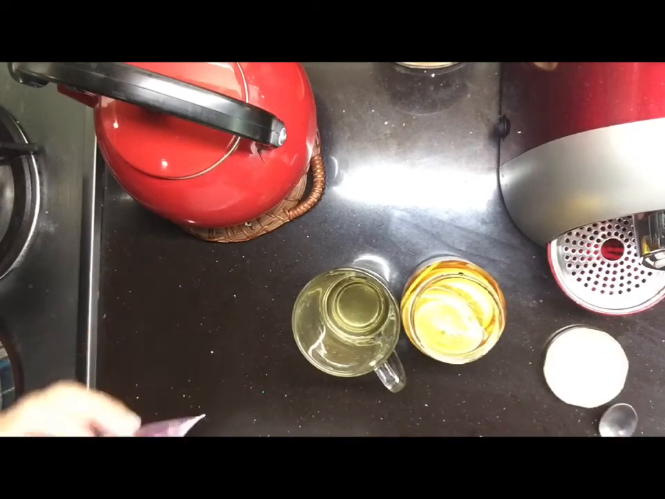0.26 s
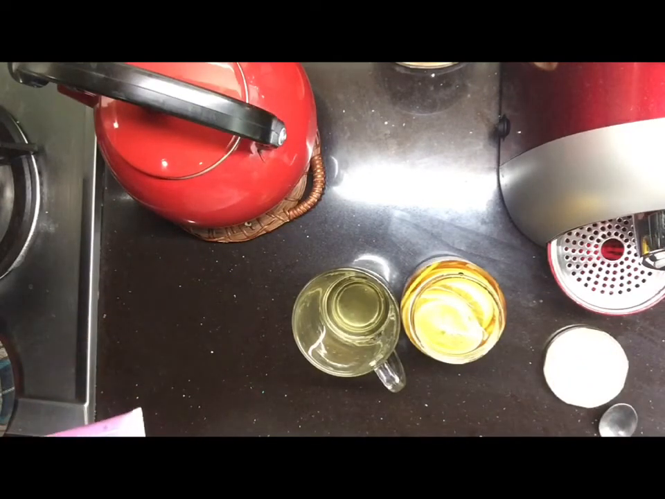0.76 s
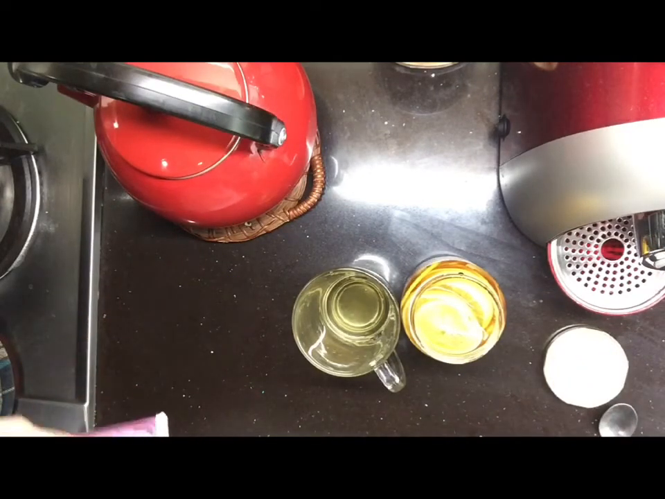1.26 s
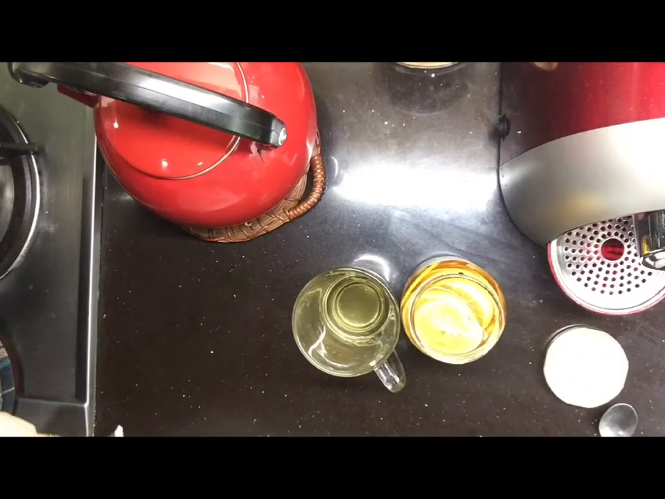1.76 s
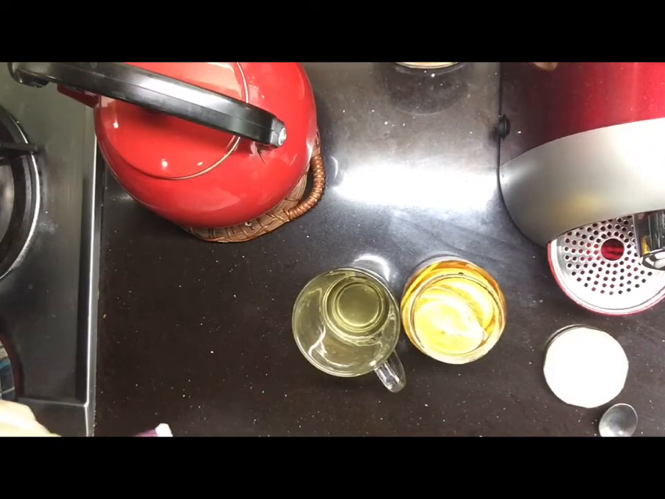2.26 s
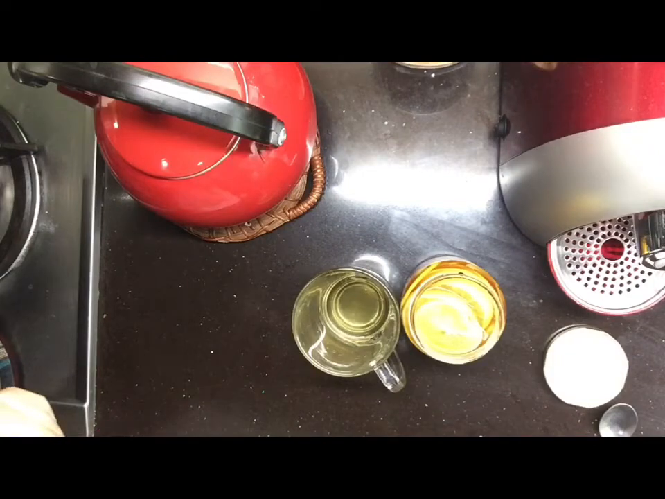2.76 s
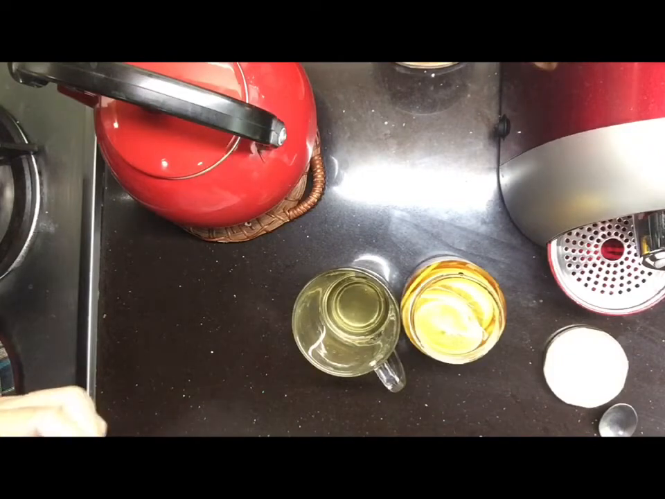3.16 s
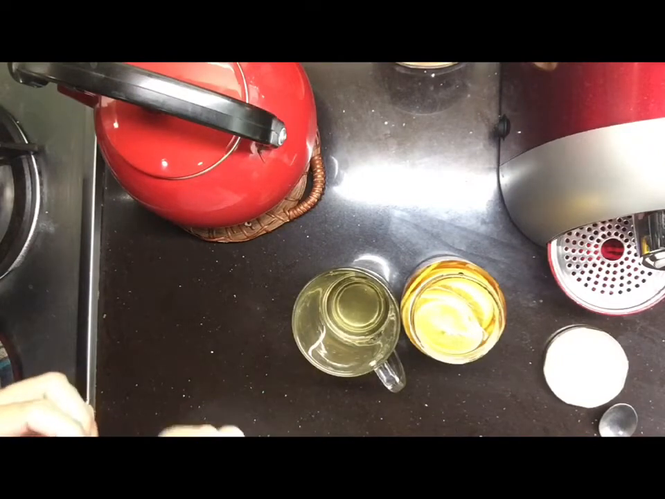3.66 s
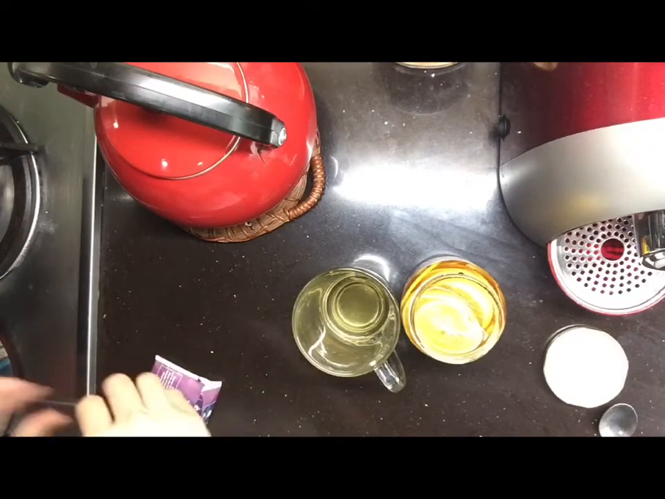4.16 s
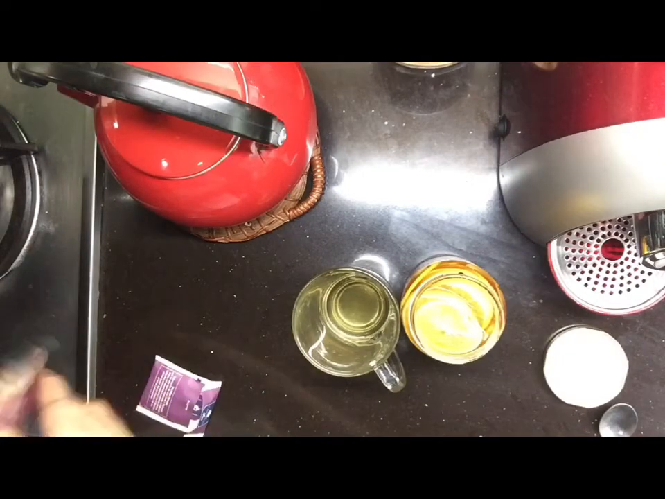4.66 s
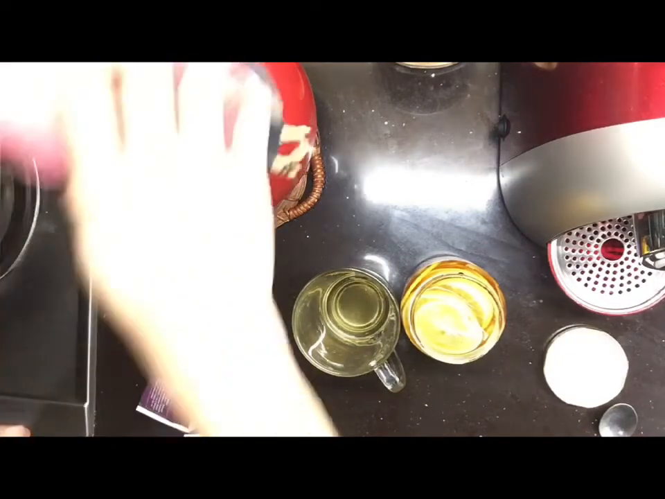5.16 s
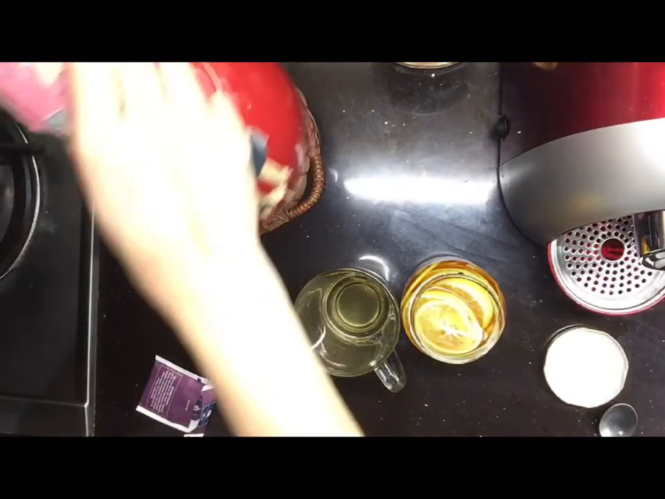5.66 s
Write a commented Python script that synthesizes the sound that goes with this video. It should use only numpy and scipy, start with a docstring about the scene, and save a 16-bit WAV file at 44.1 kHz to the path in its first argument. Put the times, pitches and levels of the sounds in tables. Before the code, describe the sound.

In a quiet kitchen, a steel spoon rattles to rest on a stone counter while a foil-lined paper sachet starts crinkling close by. Sharp snaps and dry rustles peak around 1.3 seconds, then come in looser bursts until about 4.2. A soft double thump follows, then near silence with tiny cloth brushes and faint low bumps. Close microphone, short room tail, low hum and hiss.

```python
"""Close paper rustle and sharp foil crackle, a steel spoon rattling to rest, soft thumps, faint brushing. A
foil-lined sachet is crinkled and torn over a stone counter: noise slips and snaps through panel resonances. The
spoon is decaying sines re-struck at each touch; its first touches thump the counter's low modes, and a hand
thumps them late on. Last, a cloth laid on a kettle handle brushes as crackle noise. Shaped noise gives the
kitchen's faint low hum and hiss; decaying noise gives its short tail."""
import sys
import numpy as np
from scipy import signal
from scipy.fft import rfft, irfft, next_fast_len
from scipy.io import wavfile
from scipy.ndimage import uniform_filter1d, map_coordinates

SR = 44100
rng = np.random.default_rng(int(sys.argv[2]) if len(sys.argv) > 2 else 0)


def to_wav(sig):
    """Store sig (one row per channel, or 1-D mono) as 16-bit WAV at the path in sys.argv[1].

    Samples outside -1..1 are clipped; the rate is SR.
    """
    pcm = np.clip(np.atleast_2d(sig), -1, 1) * 32767
    pcm = np.round(pcm).astype(np.int16)
    wavfile.write(sys.argv[1], SR, pcm.T)  # frames by channels


N = 260101


def amp(db):
    """Gain of a level in dB."""
    return 10 ** (np.asarray(db) / 20)


def unit(x):
    """Scale to rms 1."""
    return x / np.sqrt(np.mean(x ** 2, axis=-1, keepdims=True) + 1e-20)


def along(points, hz):
    """Interpolate (f/Hz, value) points on a log frequency axis."""
    f, value = np.transpose(points)
    return np.interp(np.log(hz + 1), np.log(f + 1), value)


def filtered(x, response):
    """Multiply the spectrum of x by a response of frequency, zero-padded."""
    m = next_fast_len(x.shape[-1] + SR // 4)
    spectrum = rfft(x, m) * response(np.fft.rfftfreq(m, 1 / SR))
    return irfft(spectrum, m)[..., :x.shape[-1]]


def peak(f, hz, q):
    """Response of one causal resonance, 1 at its centre."""
    damping = 1j * f * hz / q
    return damping / (hz * hz - f * f + damping)


def add(track, start_s, sound):
    """Mix a sound into the track at start_s."""
    part = track[round(start_s * SR):][:len(sound)]
    part += sound[:len(part)]


def wobble(rate_hz):
    """Smooth random curve with rate_hz knots a second."""
    knots = rng.standard_normal(int(N * rate_hz / SR) + 4)
    return map_coordinates(knots, [np.arange(N) * rate_hz / SR])


def burst(t, t60_s, spike):
    """Noise dying over t60_s, led by a 1.7 ms noise spike and a sharp click."""
    click = np.gradient(np.exp(-(t / .00012 - 2) ** 2))
    envelope = amp(-60 * t / t60_s) + .5 * spike * amp(-60 * t / 0.0017)
    return rng.standard_normal(len(t)) * envelope + 9 * spike * click


def crackle(per_s, spread_db, t60_s):
    """Clumped tiny slips of unequal size, each a short puff of noise; loudness evened over 50 ms."""
    size = amp(spread_db * rng.exponential(size=N) + 0.86 * wobble(60))
    slips = (rng.random(N) < per_s / SR) * size
    puffs = signal.lfilter([1], [1, -amp(-60 / (t60_s * SR))], slips)
    local_mean = uniform_filter1d(puffs, size=SR // 20).clip(1e-9)
    return puffs / local_mean * rng.standard_normal(N)


def air():
    """Steady room tone: noise shaped by a fixed spectrum."""
    # room tone spectrum: f/Hz, relative density/dB per Hz
    tone_spectrum = [(15, -57), (25, -20), (68, 1.5), (105, -1), (200, -7), (296, -6), (470, -11.5),
                     (979, -12.5), (3000, -16.5), (5000, -20), (6100, -18.5), (6860, -13.5), (7600, -22),
                     (10500, -28.5), (12500, -25.5), (16000, -35)]
    tone = filtered(rng.standard_normal(N), lambda f: amp(along(tone_spectrum, f)))
    return amp(-68) * unit(tone)


def rustle():
    """Each panel slips on its own and rings at its pitch; broader slips sound in sheet, foil and hollow."""
    # finger squeezes: t of peak/s, relative level/dB, rise/s and fall/s over 20 dB, relative foil sizzle/dB
    squeezes = [(0, -43, .1, 0.13, -11.5), (.42, -57, 1.9, 0.99, -8), (.729, -44.5, .065, 0.042, -13.5),
                (.815, -46, .06, 0.047, -12), (.87, -54, .1, 0.71, -12.5), (1.136, -45.5, 0.21, 0.28, -8),
                (1.323, -32.5, .08, 0.073, -6), (1.42, -53, 0.13, 0.42, -5.5), (1.65, -91, .1, 0.5, 0),
                (1.82, -46.5, 0.23, 0.026, -12), (2.11, -55.5, 0.46, .2, -25.5),
                (2.203, -43, 0.11, 0.1, -8.5), (2.291, -55.5, .1, 0.27, 1.5),
                (2.513, -59.5, 0.015, 0.054, -4), (2.639, -52, .07, 0.023, -9),
                (2.742, -53, 0.051, 0.042, -11.5), (2.836, -59, .13, 0.21, -11.5),
                (2.985, -60.5, 0.1, 0.1, -19.5), (3.156, -45.5, 0.087, 0.102, -13),
                (3.294, -46.5, 0.14, 0.057, -17), (3.39, -52, .11, 0.097, -14.5),
                (3.46, -53, 0.14, 0.13, -11.5), (3.65, -61, 0.025, 0.33, -5.5),
                (3.741, -51.5, 0.13, 0.1, -17.5), (3.884, -69, 0.18, .15, -14),
                (4.078, -54.5, .03, .03, -11), (4.098, -52.5, .02, 0.025, -7),
                (4.171, -46, 0.014, 0.048, -13.5)]
    # small panels of the crumpled sheet: f/Hz
    panel_pitches_hz = [1100, 1757, 2333, 3240, 3900, 5000, 6464]
    # paper spectrum: f/Hz, relative density/dB per Hz
    paper_spectrum = [(500, -39.5), (1000, -2.5), (2000, -3.5), (3700, -2.5), (6500, -9.5), (9000, -22),
                      (15000, -67)]

    peak_s, db, rise_s, fall_s, sizzle_db = np.transpose(squeezes)[..., None]
    since_s = np.arange(N) / SR - peak_s
    drop_db = 20 * np.where(since_s < 0, -since_s / rise_s, since_s / fall_s)
    swell = amp(db - drop_db)
    force = np.sqrt(np.sum(swell ** 2, axis=0))
    shine = np.sqrt(np.sum((swell * amp(sizzle_db)) ** 2, axis=0))

    slips = crackle(per_s=1200, spread_db=4.5, t60_s=0.05)
    panels = np.zeros(N)
    for hz in panel_pitches_hz:
        own_slips = crackle(per_s=160, spread_db=4, t60_s=.03)
        panels += unit(filtered(own_slips, lambda f: peak(f, hz, 3.5) ** 2)) * np.sqrt(hz)
    mix = .65 * unit(slips) + .8 * unit(panels)
    paper = unit(filtered(mix, lambda f: amp(along(paper_spectrum, f))))
    foil = unit(filtered(slips, lambda f: peak(f, 9600, 0.24) ** 2))
    hollow = unit(filtered(slips, lambda f: peak(f, 620, 1.0) ** 2))  # inside of the pouch
    return amp(-3.5) * (force * (paper + amp(-15.5) * hollow) + amp(3.0) * shine * foil)


def snaps():
    """A crease flips with a click; its panel rings as short coloured noise, treble gone first."""
    # snapping creases: t/s, relative peak level/dB, panel f/Hz, relative treble/dB, relative bass/dB
    creases = [(0.056, -17, 2670, -7, -14), (0.478, -30, 1100, -12, -16), (0.491, -37.5, 5000, -13, -26),
               (0.502, -33.5, 5900, -12.5, -21), (0.529, -30.5, 4280, -10, -11),
               (0.603, -13, 3160, -5.5, -20.5), (0.703, -30.5, 3900, -30, -40),
               (0.707, -23, 2040, -31.5, -25), (0.728, -35, 4720, -17, -38), (0.744, -24, 4000, -29, -11.5),
               (0.791, -34.5, 3400, -34, -15), (0.816, -18, 1240, -9.5, -15), (0.85, -35, 2330, -21, -26),
               (0.925, -34.5, 3600, -25, -10), (1.016, -33.5, 1960, -36, -39),
               (1.048, -26.5, 2870, -23, -40), (1.133, -13.5, 5250, -11, -37), (1.145, -20, 1960, -15, -11),
               (1.168, -43, 3640, 3, -24), (1.198, -14.5, 1320, -1.5, -55), (1.278, -23, 4080, -22, -26),
               (1.29, -21.5, 3900, -14.5, -25), (1.31, -21, 3690, -10, -25), (1.317, -15, 1222, -18, -44),
               (1.329, -12.5, 3700, -2, -17.5), (1.331, -22, 650, -30.5, -23), (1.342, -18, 3740, -18, -31),
               (1.358, -22, 4100, -13.5, 0), (1.363, -15, 4280, -25, -3), (1.369, -10.5, 2700, -12.5, -4.5),
               (1.403, -30.5, 1500, -21, 1.5), (1.439, -31, 2500, -37, -30), (1.459, -37.5, 594, -31, -3),
               (1.476, -16.5, 1260, -31, -6.5), (1.57, -35, 6900, -4.5, -9), (1.635, -33.5, 2810, -25, -5),
               (1.655, -30, 1850, -38, -14), (1.734, -18, 1640, -43, -50), (1.929, -36, 2230, -44, -8.5),
               (2.078, -39.5, 4350, -34, -38), (2.192, -24, 3950, -23, -35), (2.21, -22, 5530, -42, -13),
               (2.22, -24, 6500, -3, -30), (2.354, -33, 3800, -15, -28), (2.423, -28.5, 1950, -27, -20),
               (2.519, -26.5, 1660, -7.5, -38), (2.737, -23.5, 3880, -42, -42),
               (2.812, -27, 3540, -46, -41.5), (2.851, -23.5, 3800, -46, -46), (2.97, -40, 3320, -22, -39),
               (3.075, -37.5, 3250, -19, -37), (3.137, -27.5, 3930, -5, -9), (3.166, -28.5, 4330, -6, -9),
               (3.222, -14.5, 1870, -53.5, -21), (3.273, -28.5, 2350, -35, -44),
               (3.286, -28.5, 1950, -46, -42), (3.308, -34, 2270, -33, -42), (3.379, -31, 1240, -31, -37),
               (3.401, -20.5, 3200, -8, -58), (3.446, -20, 3800, -23, -55), (3.469, -16.5, 2080, -27, -49),
               (3.503, -31.5, 2980, -8, -13), (3.527, -37, 3500, -10, -28), (3.648, -34.5, 1100, -13, -29),
               (3.726, -33, 1290, -15.5, -30), (3.746, -14.5, 2420, -32.5, -40),
               (3.865, -43.5, 3260, -31, -25), (4.095, -30, 683, -43, -22.5), (4.15, -45.5, 890, -39, -32),
               (4.171, -28.5, 3200, -14, -20), (4.224, -45, 1210, -28, -14)]
    ref_db, ref_t60_s = -21, 0.036
    t60_db_per_db_softer = 0.34  # softer snaps linger

    out, t = np.zeros(N), np.arange(SR // 5) / SR
    for start_s, db, hz, treble_db, bass_db in creases:
        t60_s = ref_t60_s * amp(-t60_db_per_db_softer * (db - ref_db))
        body = burst(t, t60_s, spike=amp(-2.5))
        tick = burst(t, 0.21 * t60_s, spike=amp(1))
        sheet_gain = .7 * min(1, hz / 1150) ** 4  # large low panels hardly wake the rest of the sheet

        def panel(f):
            own = 1.1 * peak(f, hz, 3.1) * peak(f, hz, 1.7)
            sheet = sheet_gain * peak(f, 3100, 0.67) ** 2
            bass = amp(bass_db + 7.0) * peak(f, 395, 0.49) ** 4
            return own + sheet + bass

        treble = filtered(tick, lambda f: peak(f, 10500, 1.4) ** 2)
        sound = filtered(body, panel) + amp(treble_db + 0.5) * treble
        add(out, start_s + .0007, amp(db - 6.0) * sound / np.abs(sound).max())
    return out


def sachet():
    """The stone below sends a second copy a moment later, which combs the paper's sound."""
    delay_s = .00138

    def direct_and_echo(f):
        echo = .5 * np.exp(-2j * np.pi * f * delay_s) * np.abs(peak(f, 3600, .7))
        return 1.47 + echo

    return filtered(snaps() + rustle(), direct_and_echo)


def spoon():
    """Modes ring and flutter as the spoon rocks; each touch cracks and leaves them at new strengths."""
    # touches on stone: t/s, relative crack level/dB, crack f/Hz,
    # relative bending (stem) level/dB, relative twisting (neck, twist) level/dB
    touches = [(0.1267, -18, 7360, -16, -38.5), (0.146, -19.5, 2370, -20, -36),
               (0.1527, -21.5, 6400, -21.5, -17.5), (.170, -19, 1940, -26.5, -18),
               (0.184, -23.5, 1580, -32, -22.5), (0.199, -24.5, 7445, -35, -24),
               (.213, -19.5, 1740, -22.5, -29), (.241, -23.5, 7733, -28, -39),
               (0.257, -26, 2440, -28.5, -24.5), (.278, -26, 6960, -62, -31.5),
               (.305, -26.5, 6545, -35.5, -38.5), (0.351, -32, 4500, -49.5, -55)]
    # contact noise spectrum: f/Hz, relative level/dB
    contact_spectrum = [(60, -58), (150, -10), (700, -4.5), (2300, -0.5), (5000, 0.5), (8000, -6.5),
                        (12500, -7), (16000, -19.5)]
    # spoon modes, one list a family (bowl, stem, neck, twist): f/Hz, relative level/dB, t60/s
    mode_families = [
        [(4806, -7, .7), (4836, -3, .7), (5157, -10, .6)],
        [(9469, 0, .6), (14696, -12, .22)],
        [(6070, -7, .6), (6100, -7, .6), (9162, -3, .45), (10901, -2, .3)],
        [(11352, 0, .4), (13649, -4, .8)],
    ]

    out, t = np.zeros(N), np.arange(SR) / SR
    times_s, crack_db, crack_hz, bend_db, twist_db = np.transpose(touches)
    bowl_db = -20 - 130 * (times_s - times_s[0])  # struck at the first touch, then loses 130 dB/s
    neck_db = twist_db - 3
    last = np.searchsorted(times_s, t) - 1  # latest touch, -1 before the first
    for db, family in zip([bowl_db, bend_db, neck_db, twist_db], mode_families):
        for hz, level_db, t60_s in family:
            decay_db = 60 * (t - times_s[last]) / t60_s
            flutter_db = 1.5 * wobble(35)[:SR]
            swing = (last >= 0) * amp(db[last] + level_db - decay_db + flutter_db)
            swing = uniform_filter1d(swing, size=40)  # soften the steps
            out[:SR] += swing * np.sin(2 * np.pi * hz * (t - times_s[0]))

    chatter = amp(4 * wobble(260))  # tiny skids
    short_t = t[:SR // 4]
    for start_s, db, hz in zip(times_s, crack_db, crack_hz):
        crack = filtered(burst(short_t, 0.079, spike=1.7), lambda f: peak(f, hz, 3.7) ** 2)
        skids = burst(short_t, .13, spike=0.34) * chatter[round(start_s * SR):][:SR // 4]
        clatter = filtered(skids, lambda f: amp(along(contact_spectrum, f)))
        add(out, start_s, amp(db + 0.5) * crack + amp(db - 1.5) * clatter)
    return out


def thumps():
    """Soft blows push the counter's low modes and slap; stronger pushes ring longer, harder slaps are brighter."""
    # blows: t/s, relative low push level/dB, relative deepest mode level/dB, relative slap level/dB
    blows = [(0.149, -43.5, -22, -68), (0.202, -44, -23, -65), (4.352, -40, -14, -45),
             (4.364, -38.5, -7.5, -52.5), (4.738, -62.5, 3, -63.5), (5.265, -53, -9, -58),
             (5.282, -66.5, 8, -72), (5.442, -68, 8.5, -70), (5.495, -62, 2.5, -68)]
    # counter modes: f/Hz, relative level/dB, t60/s before scaling by force
    counter_modes = [(58.4, 3, 0.32), (108, 0.5, 0.22), (138, 1.5, 0.22), (193.9, -4, 0.16)]

    out, t = np.zeros(N), np.arange(SR // 2) / SR
    for start_s, push_db, deep_db, slap_db in blows:
        slap_hz = 850 * amp(0.16 * (slap_db + 48))
        t60_scale = 0.95 * amp(0.27 * (push_db + 41))
        low = np.zeros(len(t))
        for k, (hz, level_db, t60_s) in enumerate(counter_modes):
            mode_db = level_db + deep_db * (k == 0) - 60 * t / (t60_s * t60_scale)
            low += amp(mode_db) * np.sin(2 * np.pi * hz * t)
        low *= 1 - np.exp(-t / 0.0053)  # soft onset

        def slap_response(f):
            soft = 1 / (1 + (f / 1850) ** 12) ** .5
            return peak(f, slap_hz, 0.46) ** 2 * soft + 0.099 * peak(f, 4100, 0.98) ** 2

        slap = burst(t, 0.14 * t60_scale, spike=0.97) + 0.31 * burst(t, 0.4 * t60_scale, spike=0)
        add(out, start_s, amp(push_db) * low + amp(slap_db + 13.0) * filtered(slap, slap_response))
    return out


def cloth():
    """Faint brushing of cloth and sleeve: dense fibre slips under a drawn level curve."""
    # brushing level curve: t/s, relative level/dB
    brushing = [(4.6, -97.5), (4.92, -70.5), (5.004, -100), (5.242, -95.5), (5.27, -70.5), (5.288, -88),
                (5.488, -72), (5.544, -97.5), (5.628, -70.5), (5.65, -91.5), (5.83, -67.5), (5.898, -85)]
    times_s, level_db = np.transpose(brushing)
    t = np.arange(N) / SR
    slips = crackle(per_s=1500, spread_db=2.5, t60_s=.03)
    fibres = unit(filtered(slips, lambda f: peak(f, 1500, .7) ** 2))
    return (t > times_s[0]) * amp(np.interp(t, times_s, level_db) + 0.5) * fibres


def kitchen(x):
    """Room tail: noise whose every frequency dies at its own speed, 150 samples late."""
    # room decay: f/Hz, t60/s
    room_decay = [(200, 0.33), (600, .14), (2000, 0.12), (8000, 0.12), (15000, 0.018)]
    hz, t, z = signal.stft(rng.standard_normal(SR // 2), SR, nperseg=256)
    decay = amp(-60 * t / along(room_decay, hz)[:, None])
    tail = signal.istft(z * decay, SR, nperseg=256)[1]
    return signal.fftconvolve(np.pad(x, (150, 0)), tail / np.linalg.norm(tail))[:N]


def scene():
    """Everything on the counter, its room tail and the room tone."""
    near = spoon() + sachet() + thumps() + cloth()
    return (near + amp(-13) * kitchen(near) + air())[None]


def record(dry):
    """Band limit: nothing passes from 15.9 kHz up."""
    top_hz = 15900
    return filtered(dry, lambda f: f < top_hz)


dry = scene()
out = record(dry)
to_wav(out)
```